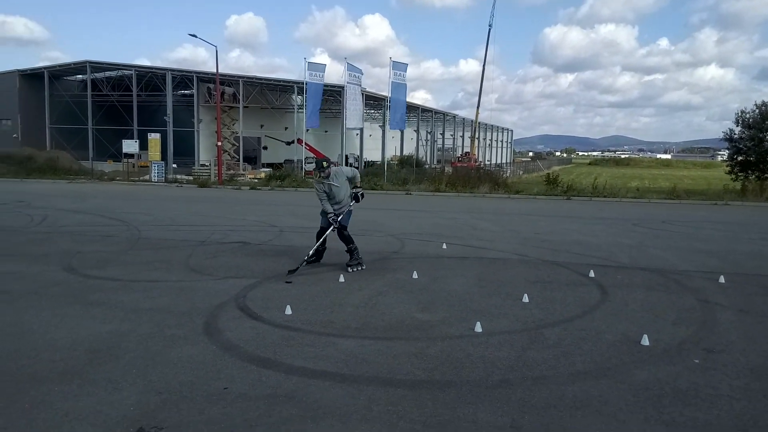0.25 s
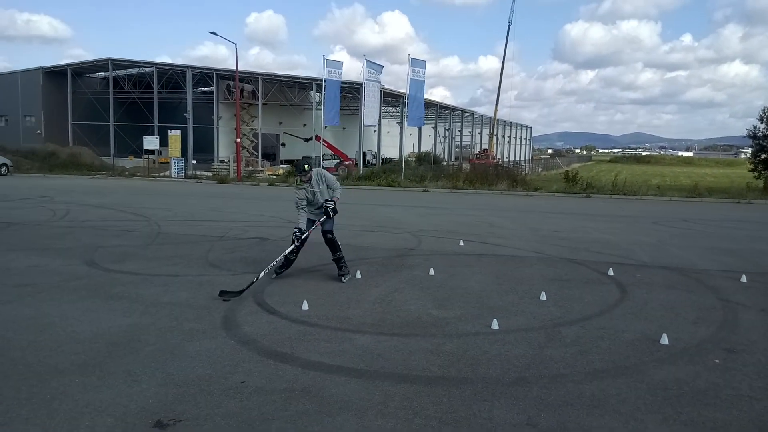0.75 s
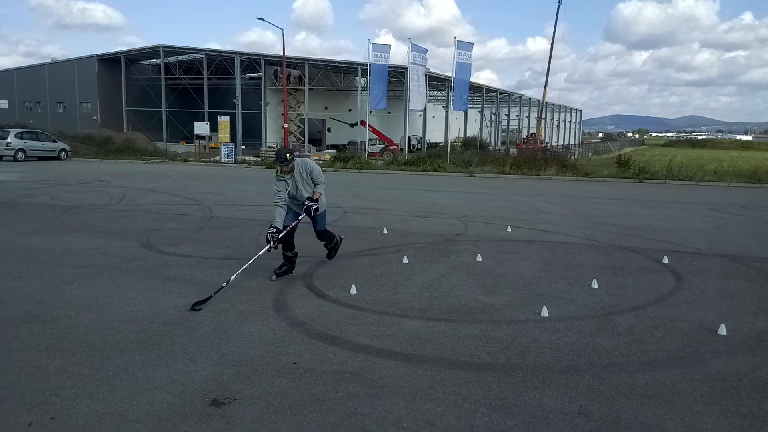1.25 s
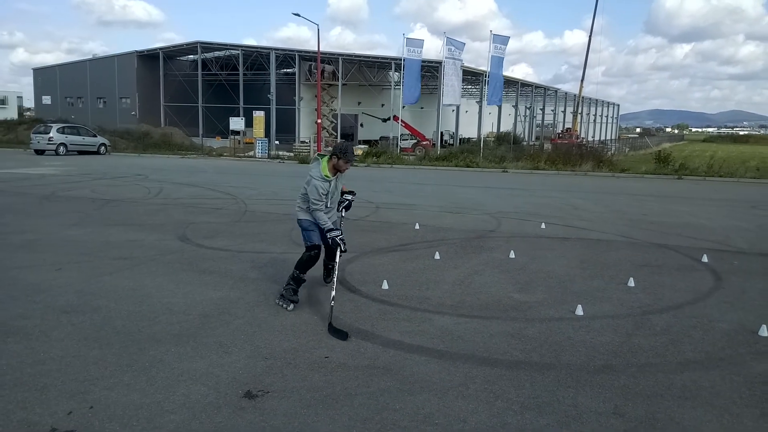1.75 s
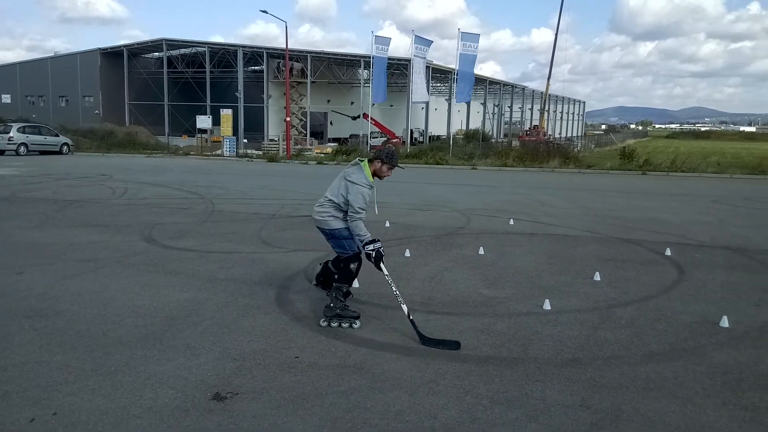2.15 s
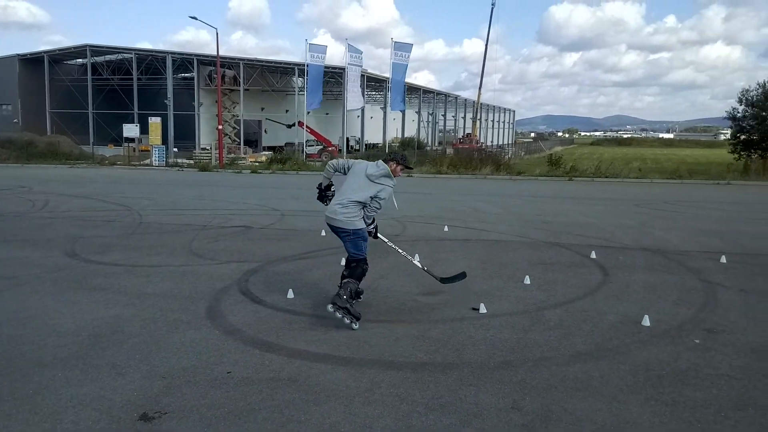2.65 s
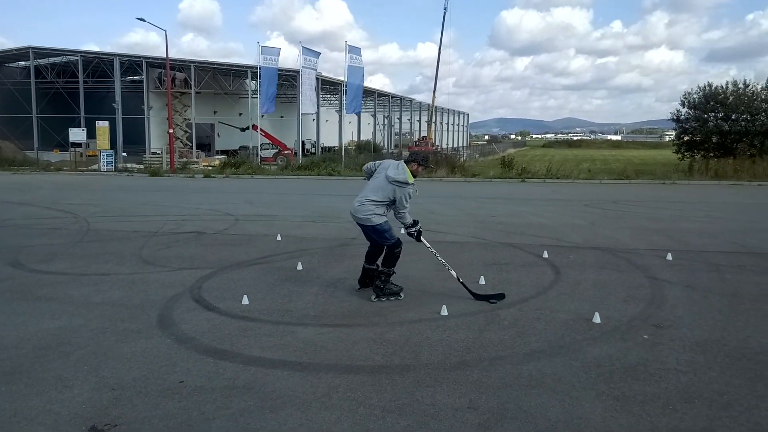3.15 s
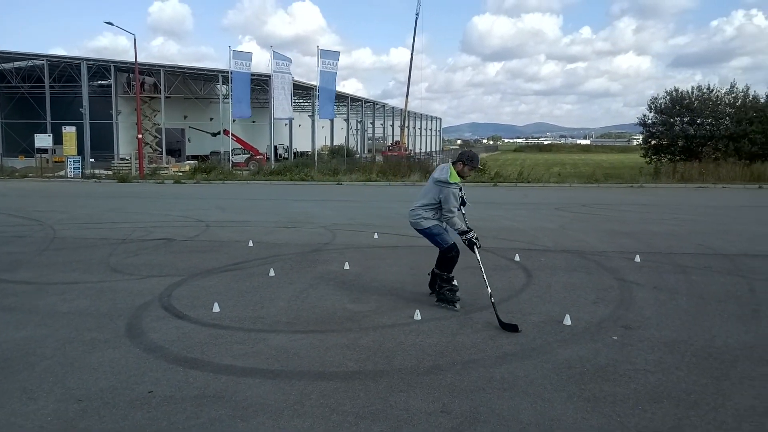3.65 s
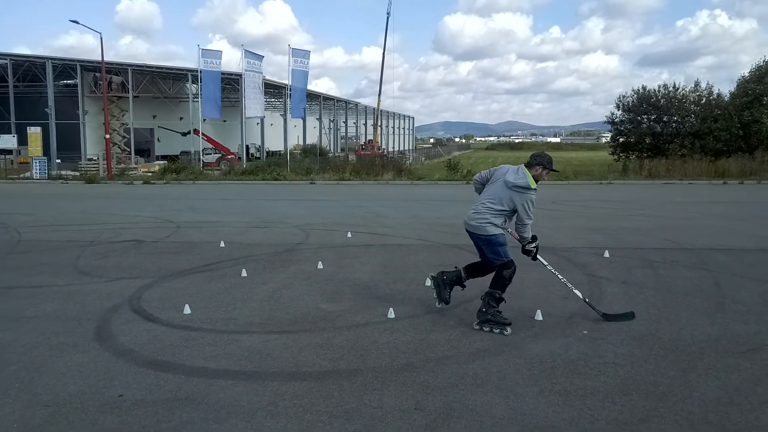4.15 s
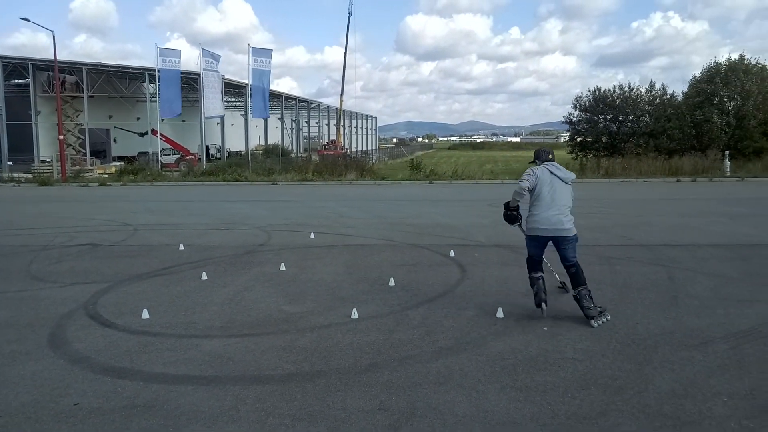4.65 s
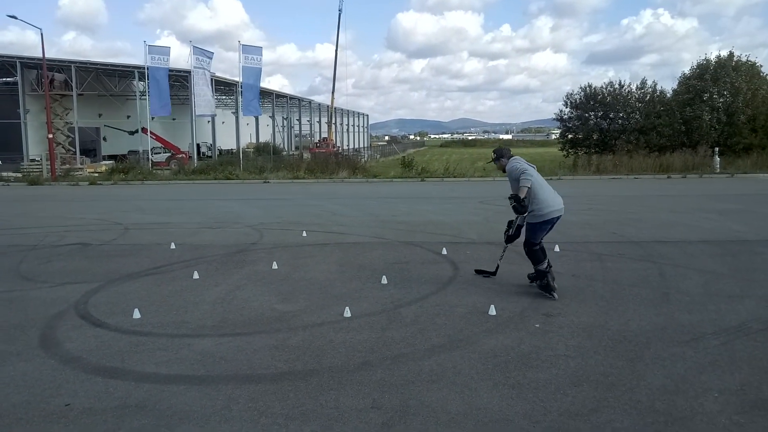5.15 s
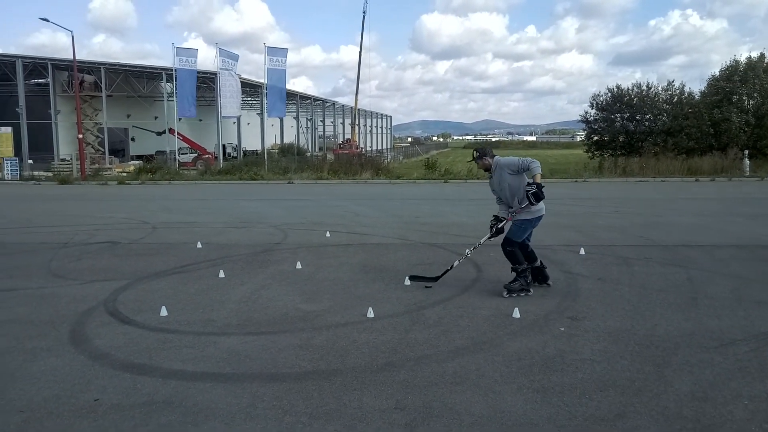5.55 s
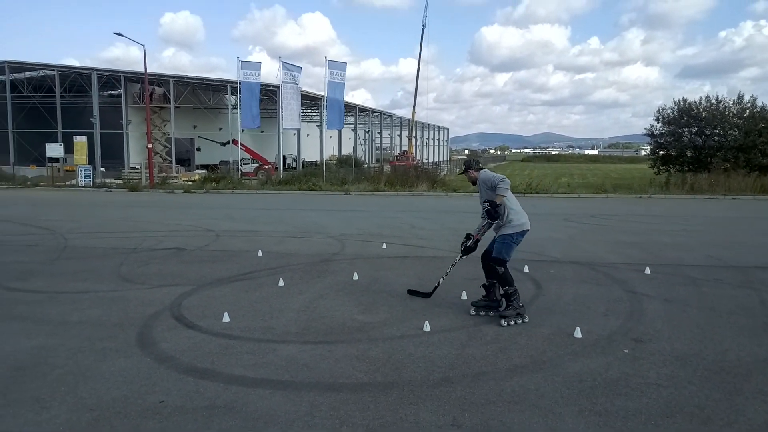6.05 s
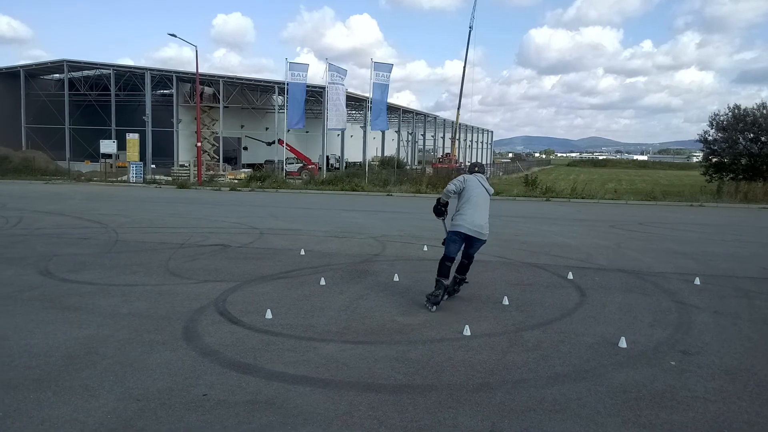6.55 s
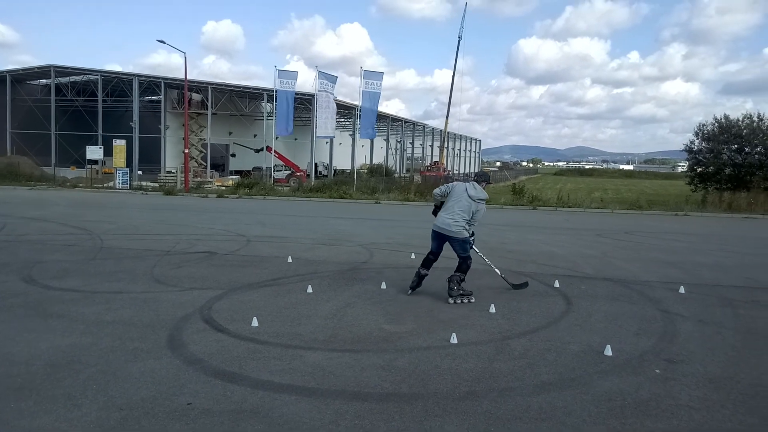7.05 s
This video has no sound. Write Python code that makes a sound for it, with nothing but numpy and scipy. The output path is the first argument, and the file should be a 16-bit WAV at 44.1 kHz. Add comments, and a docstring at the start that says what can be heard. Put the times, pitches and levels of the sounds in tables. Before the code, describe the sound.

Sharp clacks and gritty scrapes of a stick blade and puck on asphalt, over faintly rolling skates and gusty wind rumble.

```python
"""A stick blade and a street puck knock, rattle and grate on asphalt as a skater circles a few metres
from a phone in a windy open lot. Blows and fine stones ring the short modes of blade and puck, and the
dragged blade rasps as it sticks and slips. Under them the wheels hiss over the grain of the ground,
while gusts buffet the two microphone ports, mostly one at a time."""
import sys
import numpy as np
from scipy import signal
from scipy.fft import rfft, irfft
from scipy.io import wavfile
from scipy.ndimage import uniform_filter1d, map_coordinates

SR = 44100
rng = np.random.default_rng(int(sys.argv[2]) if len(sys.argv) > 2 else 0)


def wav_record(signal):
    """Record a signal, one row per channel, as 16-bit PCM in the file named by sys.argv[1]."""
    frames = np.transpose(np.atleast_2d(signal))
    bounded = np.clip(frames, -1, 1)
    # unit amplitude maps onto the largest positive 16-bit level
    quanta = np.round(bounded * 32767).astype(np.int16)
    wavfile.write(sys.argv[1], SR, quanta)


N = 321489

# Modes of blade and puck. Each row: pitch in Hz, gain in dB, ring time (t60) in seconds.
BODY_MODES = [(888, 3, 0.019), (1063, 19.5, 0.0025), (1562, -2.5, 0.019), (1823, 9, 0.0036),
              (2565, -0.5, 0.019), (2830, -7, 0.0057), (3330, 6.5, 0.012), (3740, 15, 0.0018),
              (3975, 3.5, 0.022), (4633, -3.5, 0.021), (4800, -16, 0.013), (4910, 11, 0.0032),
              (6020, -10.5, 0.0047)]
# The tone of grit as the phone hears it: dull above 5 kHz, with a small lift near 15 kHz.
# Each row: frequency in Hz, gain in dB.
GRIT_EQ = [(500, -12), (1000, -4), (3000, 0), (5200, -1), (7000, -16), (9000, -25), (13500, -34),
           (15000, -24), (16000, -28)]
SCRAPE_RISE_S, SCRAPE_FADE_S = 0.0014, 0.0081


def knocks(focus_oct=.3, broad_db=-15, skid_ms=3.1, rise_ms=0.54, direct_db=-5, crack_db=-19):
    """A blow, its rebounds and a gritty skid ring blade and puck; where it lands picks the modes."""
    # Each row: time in seconds, level in dB, centre of the ring in Hz, relative thud and skid in dB.
    blows = [(0.122, -17.5, 2300, 4.5, -2), (0.171, -23.5, 3120, -10, -27), (0.466, -14, 2100, -44, -13),
             (0.5405, -7.5, 2600, -19, -16.5), (0.7783, -7.5, 3860, -19, 2), (1.2951, -13.5, 2450, 0, -19),
             (1.346, -17, 2340, -3, -2), (1.684, -18, 5100, -10, -17), (2.1327, -18.5, 1400, -26, -9),
             (2.1744, -22, 2630, -20, -27), (2.4014, -16, 2740, 0.5, 6.5), (2.549, -25, 3370, 1.5, 3),
             (2.876, -14.5, 1790, 3.5, -2), (2.904, -25.5, 1950, -1, -4), (3.011, -13, 1900, 4, 7),
             (3.1454, -18.5, 5460, -14, 7.5), (3.2855, -29.5, 5100, -18, 10), (3.3544, -31, 5100, -20, -9),
             (3.5795, -17, 4380, -21, -3), (3.6695, -8, 2180, -40, -12.5), (3.7571, -14.5, 1730, -31, 3),
             (3.869, -26.5, 2550, -20, -11), (3.907, -23, 3370, 3.5, -25), (3.996, -26.5, 1800, -9, 9),
             (4.0508, -28, 1500, 11.5, -34), (4.0909, -20, 5030, 2, -36), (4.85, -26.5, 1470, 12.5, -11),
             (4.962, -13.5, 3130, -19, -22.5), (5.078, -19.5, 4600, -19, -27),
             (5.144, -19.5, 4000, -27, -13), (5.1665, -13.5, 2850, -22, -8), (5.176, -20.5, 1460, -25, -15),
             (5.2086, -17.5, 4570, -26, -1), (5.2225, -19, 4740, -33, -9), (5.238, -20.5, 4700, -6, -7),
             (5.25, -10.5, 5230, -43, -25), (5.268, -18, 4740, -33, -23), (5.3002, -27, 2110, -26, -9),
             (5.324, -24, 4170, -24, 4), (5.345, -26, 1660, 0, -37), (5.3667, -27, 1640, 2, 6),
             (5.3895, -26.5, 5000, -7, -17), (5.451, -24.5, 2900, -10, -34), (5.647, -26.5, 2920, -10, -16),
             (5.7443, -9, 1590, 2.5, -50), (5.8839, -5, 1310, -37, -39), (5.962, -21, 3660, -33, -29),
             (5.968, -26, 3700, -20, -14), (5.9886, -15, 4900, -20, -36), (6.006, -14.5, 4900, -7, -28),
             (6.013, -25, 4500, -21, -22), (6.0423, -14.5, 4000, -14, -17), (6.111, -25, 2350, -24, -27),
             (6.141, -21, 2690, -10, 3.5), (6.583, -23.5, 2550, -12, 1), (6.7534, -23.5, 4600, -4, 0),
             (7.156, -22, 4200, 5, 5)]
    # The blade slaps down again. Each row: delay in ms, share of the blow.
    rebounds = [(1.22, .5), (2.35, .35)]
    size, lead = 3000, 300
    out = np.zeros(N + size)
    t_ms = (np.arange(size) - lead) * 1000 / SR
    noise = rng.standard_normal((len(blows), size))
    detune = rng.standard_normal((len(blows), len(BODY_MODES)))
    for (s, db, centre_hz, thud_db, skid_db), grit, drift in zip(blows, noise, detune):
        push = undb(skid_db) * grit * np.exp(np.minimum(t_ms / rise_ms, -t_ms / skid_ms))
        for ms, share in [(0, 1.0)] + rebounds:
            push[lead + int(ms * (1 + .05 * drift[0]) * SR / 1000)] += share * np.sign(grit[0])
        contact = colour(push, GRIT_EQ)
        body = thud = 0
        for (hz, mode_db, t60), d in zip(BODY_MODES, drift):
            if hz > 1400:
                share = np.exp(-(np.log2(hz / centre_hz) / focus_oct) ** 2) + undb(broad_db)
                body += share * undb(mode_db) * ring(contact, hz * (1 + .02 * d), t60)
            else:
                thud += undb(mode_db) * ring(push, hz, t60)
        crack = bandpass(push + 0.26 * grit * np.exp(-np.abs(t_ms) / 1.1), 2, 6500, 12000)
        crack *= (centre_hz / 4000) ** 0.26  # a low ring means a softer contact and a duller crack
        direct = bandpass(contact, 1, 0.7 * centre_hz, 1.07 * centre_hz)
        knock = peak_at(body, 0) + peak_at(direct, direct_db) + peak_at(thud, thud_db)
        start = int(s * SR) - lead
        out[start:start + size] += undb(db) * (knock + undb(crack_db) * crack)
    return signal.sosfilt(signal.butter(3, 550, "high", fs=SR, output="sos"), out[:N])


def rattle(faint_per_s=150, spread_db=4.5):
    """The loose puck ticks as it slides, each tick weighting its modes its own way."""
    # Clear ticks. Each row: time in seconds, strength in dB.
    ticks = [(0.303, -16), (0.39, -18), (0.681, -19), (1.0052, -24), (1.0244, -31), (1.059, -23),
             (1.0871, -22), (1.2151, -20.5), (1.4785, -18), (1.5947, -16), (1.6292, -15), (1.765, -17.5),
             (1.7918, -15.5), (1.8322, -13), (2.4546, -33), (2.4808, -24), (2.508, -17), (2.595, -25),
             (2.634, -26), (2.6807, -12.5), (2.7222, -23)]
    # Faint ticks between them. Each row: time in seconds, typical strength in dB.
    faint_levels = [(0, -30.5), (1.35, -36.5), (1.5, -27), (2.45, -29.5), (2.74, -32.5), (2.8, -36.5),
                    (7.29, -41)]
    # The puck's own ring. Each row: pitch in Hz, gain in dB, t60 in seconds.
    puck_modes = [(2480, -10, .012), (2950, -10, .009), (3560, -8.5, .019), (4840, -24, .02)]
    faint = rng.random(N) < faint_per_s / SR
    push = faint * undb(curves(faint_levels)[0] + spread_db * rng.standard_normal(N))
    s, db = np.transpose(ticks)
    push[(s * SR).astype(int)] = undb(db)
    out = 0
    for hz, mode_db, t60 in puck_modes:
        out += undb(mode_db) * ring(push * undb(2.4 * rng.standard_normal(N)), hz, t60)
    return bandpass(out, 4, 2200, 6500)


def grating_levels():
    """Steady drag plus short hard scrapes: dB curves for the low, middle, high and top bands."""
    # Each row: time in seconds, middle band in dB, low and high bands in dB relative to it.
    drag = [(0, -56.5, 6, 2), (.3, -53.5, 2, 1.5), (.7, -59, 3, 1), (1.3, -68, 8.5, 7.5),
            (1.5, -42.5, 3, -3.5), (1.75, -49.5, 4, 6), (2.02, -46.5, 5, -3.5), (2.55, -59, -1, 4.5),
            (2.8, -58.5, 6, -1.5), (3.25, -56.5, 8, 4), (3.65, -47.5, 2.5, -6), (4.1, -50.5, 5.5, 4.5),
            (4.4, -47, 0, 1), (5.0, -49.5, -3, -5.5), (5.5, -57, 0.5, 2.5), (6.2, -53, 3.5, -5),
            (6.5, -57, 6.5, 0), (7.29, -64, 8, 3)]
    # Each row: start and length in seconds, then the same three levels.
    scrapes = [(0.108, 0.027, -42, 4, 5), (0.63, 0.0042, -36, -17, -6.5), (0.795, 0.016, -41.5, 4, 1.5),
               (0.864, 0.067, -44, -3, -1), (1.295, 0.027, -33.5, 2, -12), (2.077, 0.35, -46, 13.5, 2.5),
               (2.86, 0.043, -54, -9, 6), (3.059, 0.03, -40, -10, -7), (3.322, 0.075, -37.5, -0.5, -5),
               (3.389, 0.13, -44.5, 1, -10), (3.807, 0.056, -42.5, 2, 0), (4.051, 0.14, -47, 7, -14),
               (4.456, 0.1, -45.5, -28, -16), (5.02, 0.16, -50, -7, -3.5),
               (5.102, 0.082, -37.5, -10.5, -13), (5.199, 0.076, -46.5, 5.5, 0.5),
               (5.929, 0.052, -51.5, 3, 4), (6.08, 0.019, -55, -11, 5), (6.167, 0.24, -53, -14, 0.5)]
    drag_db, drag_low, drag_high = curves(drag)
    s, length, scrape_db, scrape_low, scrape_high = np.transpose(scrapes)
    low, middle, high = (
        add_db(drag_db + tilt, swells(s, s + length, SCRAPE_RISE_S, SCRAPE_FADE_S, scrape_db + lift))
        for tilt, lift in ((drag_low, scrape_low), (0, 0), (drag_high, scrape_high)))
    return low, middle, high, high - 11


def grating(grains_per_s=7000, own_share=0.6, direct_db=-5):
    """Fine stones catch blade, puck and skidding wheels in a wide, chattering hiss."""
    # The blade skips as it drags. Each row: time in seconds, relative depth of the chatter.
    chatter = [(0, 2.6), (4.9, 3), (5.25, 4), (5.4, 5), (5.46, 4), (5.9, 4), (5.95, 5), (6.1, 5), (6.25, 3),
               (7.29, 3)]
    grains = (rng.random((3, N)) < grains_per_s / SR) * rng.standard_normal((3, N))
    chatter_db = curves(chatter)[0] * 1.45 * np.tanh(walk(260)) + walk(50)
    stones = (grains[0] + own_share * grains[1:]) * undb(chatter_db)  # shared, plus each port's own
    wander_db = 2.6 * walk(45, channels=len(BODY_MODES))  # modes come and go as the contact moves
    low, middle, high = np.zeros((3, 2, N))
    for (hz, mode_db, t60), swing_db in zip(BODY_MODES, wander_db):
        group = low if hz < 2000 else middle if hz < 3800 else high
        group += undb(mode_db) * ring(stones * undb(swing_db), hz, t60)
    grit = colour(stones, GRIT_EQ)
    top = grit * undb(4 * walk(90))
    bands_hz = [(600, 2100), (2100, 3800), (3800, 7000), (7000, 16500)]
    out = 0
    for layer, edges, band_db in zip((low, middle, high, top), bands_hz, grating_levels()):
        voiced, direct = bandpass(layer, 4, *edges), bandpass(grit, 4, *edges)
        out += undb(band_db) * (level(voiced, 0) + level(direct, direct_db))
    return out


def rasps(slips_per_s=1400, t60=.02):
    """The dragged blade sticks and slips, singing on one mode and two weaker ones above it."""
    # Each row: start in seconds, length in seconds, level in dB, pitch in Hz.
    strokes = [(0.79, 0.016, -29, 2730), (0.886, 0.051, -32, 2580), (1.409, 0.037, -33.5, 2620),
               (2.167, 0.24, -38.5, 2590), (3.793, 0.124, -45.5, 4880), (4.048, 0.085, -50.5, 870),
               (4.448, 0.074, -35.5, 3790), (6.077, 0.026, -40, 2430)]
    slips = (rng.random(N) < slips_per_s / SR) * rng.standard_normal(N) * undb(2.4 * walk(110)[0])
    out = 0
    for s, length, db, hz in strokes:
        sung = sum(gain * ring(slips, ratio * hz, t60) for ratio, gain in [(1, 1), (1.1, .7), (1.35, .45)])
        out += level(sung, swells(s, s + length, SCRAPE_RISE_S, SCRAPE_FADE_S / 2, np.array([db])))
    return out


def wheels(level_db=-52):
    """Soft wheels hiss over the grain of the asphalt, barely alike at the two ports."""
    # Each row: frequency in Hz, gain in dB.
    wheel_eq = [(290, -30), (500, 0), (1820, -16), (2610, -4), (3650, -6), (7750, -22), (10200, -43),
                (16000, -40)]
    hiss = rng.standard_normal((2, N)) * undb(2 * walk(11) + 0.15 * walk(31, channels=2))
    return level(colour(hiss, [(200, -1)] + list(wheel_eq)), level_db)


def gusts(rise_share=0.26, fade_share=0.29):
    """Force of the wind at each port in dB: buffets swell out of a breeze."""
    # Each row: time in seconds, force at the left and right ports in dB.
    breeze = [(0, -61, -32), (0.3, -57, -38.5), (0.65, -59.5, -58), (1.2, -51, -45.5), (1.6, -50, -53),
              (2.2, -49, -39), (2.9, -54, -38), (3.15, -75, -46), (3.7, -42, -47), (4.1, -70, -53.5),
              (4.6, -56, -44), (4.8, -56, -36), (5.0, -60, -56), (5.7, -50, -41.5), (6.3, -58.5, -61.5),
              (6.65, -73, -62), (6.9, -48, -44), (7.29, -49, -54)]
    # Each row: time of the crest in seconds, force in dB, left minus right in dB, length in seconds.
    buffets = [(0.005, -13, -36, 0.036), (0.094, -26, 18, 0.057), (0.189, -24.5, -40, 0.14),
               (0.307, -26, 22, 0.083), (0.941, -28, -28, 0.015), (1.337, -22.5, 25, 0.053),
               (1.568, -14, -33, 0.081), (1.658, -19, -18, 0.014), (1.758, -23.5, -35, 0.15),
               (1.911, -24.5, -29, 0.015), (1.952, -24.5, 23, 0.033), (2.103, -25, 17, 0.092),
               (2.21, -27.5, 23, 0.067), (2.345, -23.5, 17, 0.095), (2.39, -29.5, -1, 0.11),
               (2.495, -22.5, -29, 0.03), (2.651, -23, -1.5, 0.16), (2.791, -13.5, -38, 0.068),
               (2.95, -18.5, 25, 0.04), (2.982, -19, 7, 0.078), (3.02, -29.5, -14, 0.087),
               (3.106, -22.5, -38, 0.029), (3.187, -25.5, -39, 0.11), (3.291, -21.5, -43, 0.031),
               (3.452, -22.5, -32, 0.077), (3.615, -34.5, -29, 0.15), (3.736, -25.5, -24, 0.031),
               (4.298, -24.5, -25, 0.072), (4.368, -22, 9.5, 0.096), (4.557, -21, -30, 0.12),
               (4.59, -16.5, 11, 0.056), (4.637, -26, -34, 0.19), (4.729, -21.5, -22, 0.032),
               (4.767, -23, -3.5, 0.065), (4.812, -23.5, -14, 0.05), (5.185, -17.5, -30, 0.048),
               (5.597, -24.5, 31, 0.062), (6.507, -27.5, 21, 0.095), (6.584, -23.5, -17, 0.1),
               (6.631, -22.5, 4, 0.11), (6.719, -21.5, -30, 0.061), (6.77, -19.5, 19, 0.049),
               (6.944, -23, 31, 0.036), (7.103, -30, 27, 0.16)]
    s, db, lean_db, length = np.transpose(buffets)
    rise, fade = rise_share * length, fade_share * length
    return np.array([add_db(calm_db, swells(s, s, rise, fade, db + np.minimum(side * lean_db, 0)))
                     for calm_db, side in zip(curves(breeze), (1, -1))])


def wind(lumpy_db=3.0, eddies_per_s=200, thump_db=3):
    """Eddies thump each port alone over a low flutter; harder lumps push up into the low mids."""
    # Each row: centre in Hz, level in dB, extra dB for each dB of force above -33.
    bands = [(54, -14, -0.43), (108.2, 1, -0.52), (175.4, 4, -0.37), (281.4, 1.5, 0.16),
             (450, -14.5, 1), (1220, -21.5, -1.06), (2180, -22, -1.1)]
    force_db = gusts() + lumpy_db * np.clip(walk(70, channels=2), -2, .6)
    thumps = (rng.random((2, N)) < eddies_per_s / SR) * rng.uniform(-1.03, 1, (2, N))
    air = level(thumps, thump_db) + rng.standard_normal((2, N))
    out = 0
    for hz, band_db, reach in bands:
        band = level(bandpass(air, 2, hz / 1.5, hz * 1.5), band_db)
        flutter_db = 2 * np.tanh(walk(30, channels=2))
        out += band * undb(force_db + reach * (force_db + 33) + flutter_db)
    return out


def wind_pops(pitch_hz=520, rise_ms=3, size=1500):
    """A few uneven swings of pressure hit one port and die within hundredths of a second."""
    # Each row: start in seconds, peak in dB, left minus right in dB.
    hits = [(0.063, -9.5, 28), (0.143, -10.5, -23), (1.552, -5.5, -18), (1.753, -9.5, -31),
            (1.942, -20, 20), (2.786, -2, -33), (4.347, -15.5, 20), (5.174, -26, -14), (5.586, -36, 24),
            (6.63, -25, 18), (6.716, -21, -25), (6.756, -16.5, 21), (6.937, -23, 22)]
    out = np.zeros((2, N + size))
    t_ms = np.arange(size) * 1000 / SR
    for (s, db, lean_db), air in zip(hits, rng.standard_normal((len(hits), size))):
        pop = bandpass(air, 3, pitch_hz / 2, pitch_hz * 1.7) * t_ms * np.exp(-t_ms / rise_ms)
        port_db = db + np.minimum([lean_db, -lean_db], 0)
        out[:, int(s * SR):int(s * SR) + size] += peak_at(pop, port_db[:, None])
    return out[:, :N]


def ports(x, scatter_db=-8, scatter_ms=6):
    """Sound reaches one port later, scatters off the hands and resonates in the phone's case."""
    # The skater's bearing. Each row: time in seconds, lag of the left port in ms.
    bearing = [(0, -0.1), (.7, -0.12), (1.3, -0.15), (2.2, 0.0019), (3.2, 0.037), (4.3, 0.084),
               (5.2, 0.037), (6.2, 0.024), (7.29, 0.054)]
    # Case resonances behind each port. Each row: centre in Hz, width in Hz, added gain.
    left_modes = [(1750, 700, 1.0), (2650, 450, 1.3), (3350, 500, -.7), (6000, 900, .8)]
    right_modes = [(2460, 59, 0.074), (3396, 380, 0.62), (4410, 990, 1), (7600, 660, 1)]
    hz = np.arange(N // 2 + 1) * SR / N
    t_ms = np.arange(2000) * 1000 / SR
    half_lag = curves(bearing)[0] * SR / 2000
    out = []
    for sound, side, modes in zip(x, (1, -1), (left_modes, right_modes)):
        arrival = map_coordinates(sound, [np.arange(N) - side * half_lag], order=3, mode="nearest")
        scatter = rng.standard_normal(len(t_ms)) * np.exp(-t_ms / scatter_ms)
        arrival += signal.oaconvolve(arrival, level(scatter, scatter_db) / np.sqrt(len(t_ms)))[:N]
        response = 1 + sum(gain / (1 + 1j * (hz - centre ** 2 / (hz + 1)) / width)
                           for centre, width, gain in modes)
        out.append(irfft(rfft(arrival) * response, N))
    return np.array(out)


def undb(db):
    return 10 ** (np.asarray(db) / 20)


def level(x, db):
    return x * undb(db) / np.sqrt(np.mean(x ** 2))


def peak_at(x, db):
    return x * undb(db) / np.abs(x).max()


def add_db(a_db, b_db):
    """Level of two unrelated sounds together."""
    return 10 * np.log10(undb(a_db) ** 2 + undb(b_db) ** 2)


def bandpass(x, order, low_hz, high_hz):
    return signal.sosfilt(signal.butter(order, [low_hz, high_hz], "band", fs=SR, output="sos"), x)


def curves(table):
    """Columns of a table joined by straight lines, one value a sample."""
    s, *columns = np.transpose(table)
    return [np.interp(np.arange(N) / SR, s, c) for c in columns]


def colour(x, points):
    """Minimum-phase EQ through (Hz, dB) points."""
    hz, db = np.transpose(points)
    log_gain = np.interp(np.log(np.arange(513) * SR / 1024 + 1), np.log(hz), db) * np.log(10) / 20
    cepstrum = irfft(log_gain)
    cepstrum[1:512] *= 2
    cepstrum[513:] = 0
    impulse = irfft(np.exp(rfft(cepstrum))).reshape((1,) * (x.ndim - 1) + (-1,))
    return signal.oaconvolve(x, impulse, axes=-1)[..., :x.shape[-1]]


def ring(x, hz, t60):
    """One decaying mode."""
    pole = np.exp(2j * np.pi * hz / SR - np.log(1000) / (t60 * SR))
    return signal.lfilter([1], [1, -pole], x).imag


def walk(rate, channels=1):
    """Random levels held 1 / rate seconds and smoothed twice."""
    hold = max(int(SR / rate), 2)
    steps = np.repeat(rng.standard_normal((channels, N // 8))[:, :N // hold + 1], hold, axis=1)
    return 2.3 * uniform_filter1d(uniform_filter1d(steps, hold), hold)[:, :N]


def swells(start, end, rise, fade, db):
    """Level in dB of events that rise, hold and die away; their powers add."""
    t = np.arange(0, N, 32)[:, None] / SR
    shape = np.exp(-np.maximum(start - t, 0) / rise - np.maximum(t - end, 0) / fade)
    power = shape ** 2 @ undb(db) ** 2
    return np.interp(np.arange(N) / SR, t[:, 0], 10 * np.log10(power + 1e-12))


def scene():
    """Stick and puck move across the two ports, over wheels and wind."""
    return ports(knocks() + rattle() + grating() + rasps()) + wheels() + wind() + wind_pops()


def record(dry, top_hz=16200):
    """The phone rounds the loudest peaks and cuts the top."""
    rounded = 1.453 * np.tanh(dry / 1.748)
    return signal.sosfilt(signal.ellip(10, .2, 60, top_hz, fs=SR, output="sos"), rounded)


dry = scene()
out = record(dry)
wav_record(out)
```